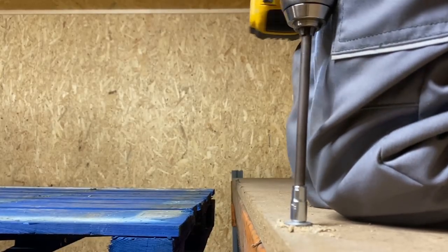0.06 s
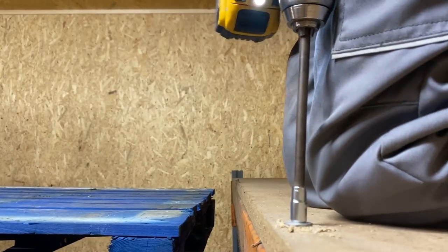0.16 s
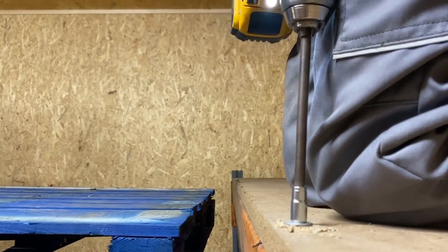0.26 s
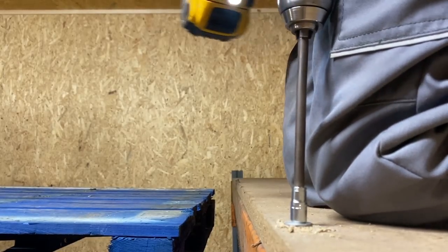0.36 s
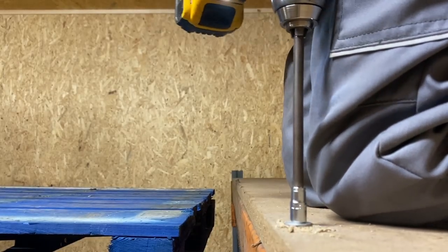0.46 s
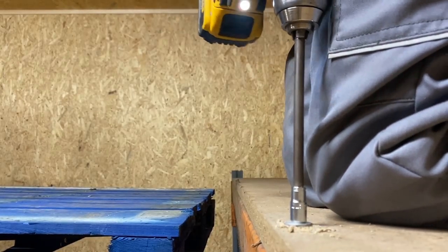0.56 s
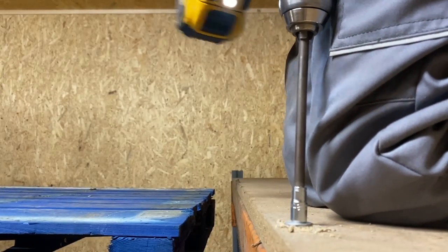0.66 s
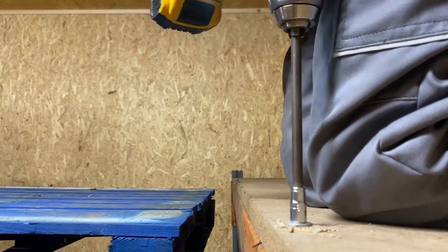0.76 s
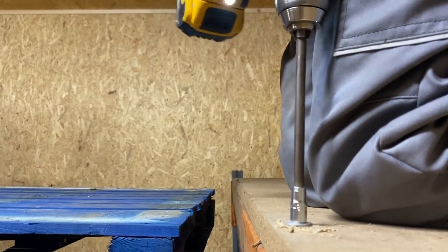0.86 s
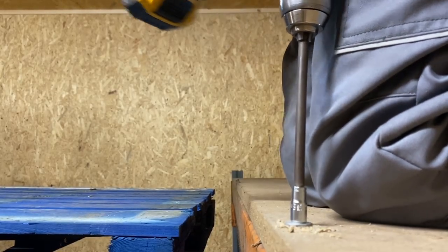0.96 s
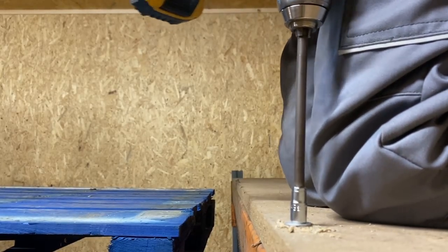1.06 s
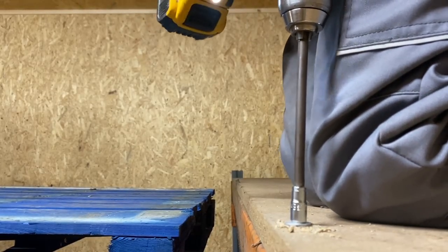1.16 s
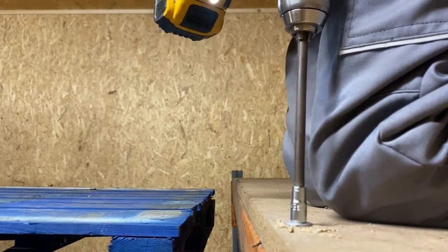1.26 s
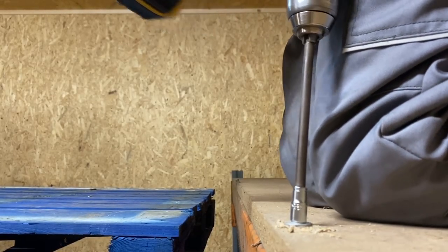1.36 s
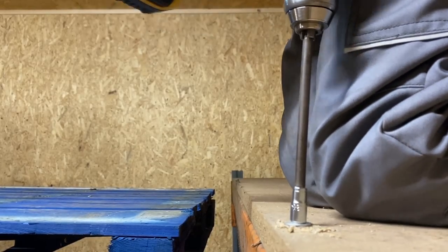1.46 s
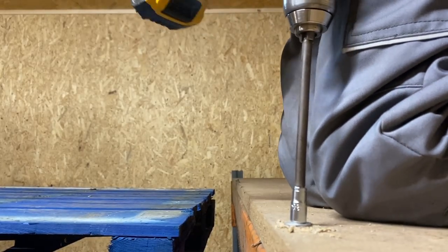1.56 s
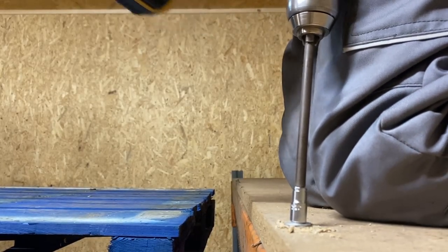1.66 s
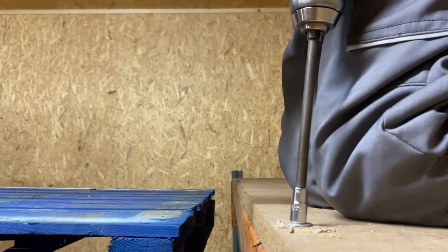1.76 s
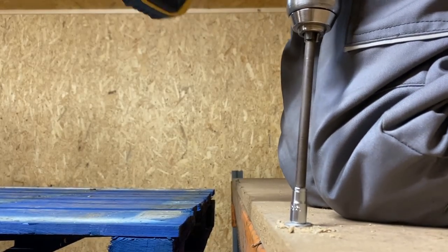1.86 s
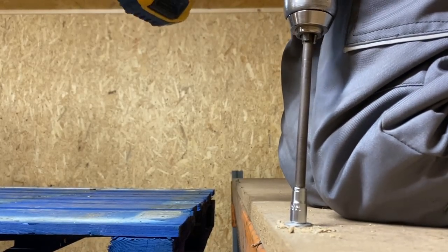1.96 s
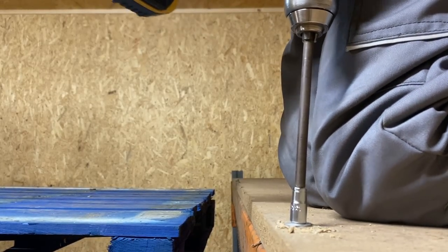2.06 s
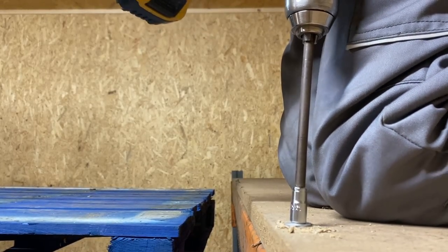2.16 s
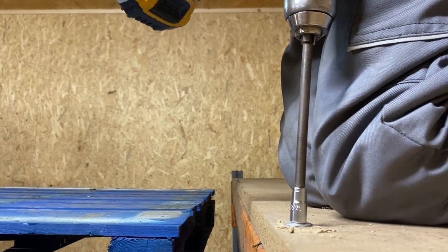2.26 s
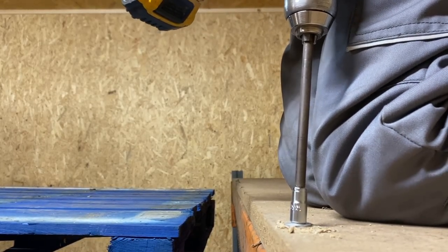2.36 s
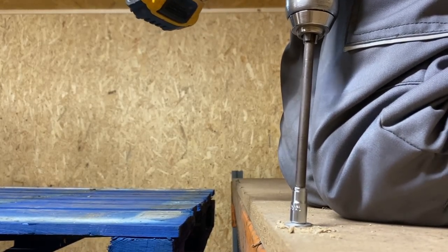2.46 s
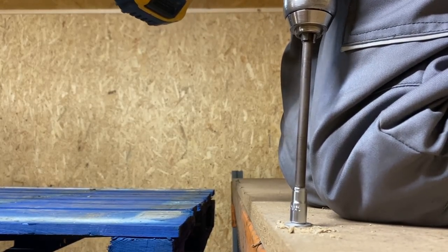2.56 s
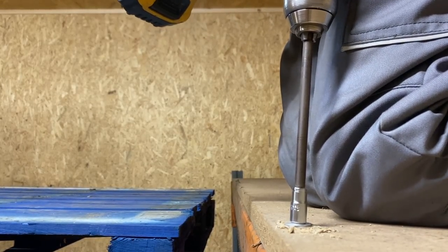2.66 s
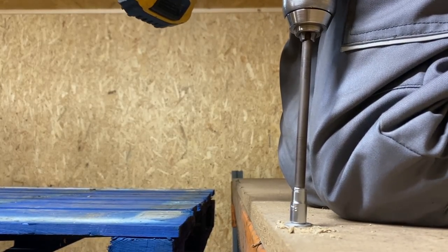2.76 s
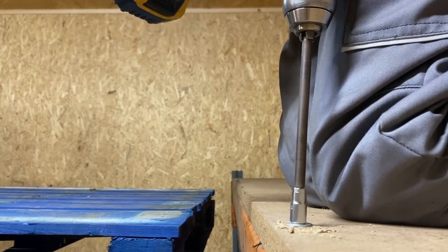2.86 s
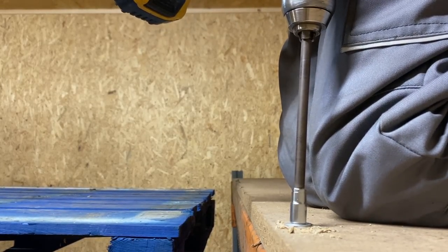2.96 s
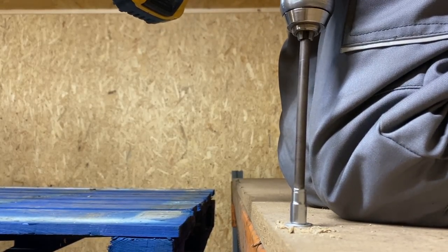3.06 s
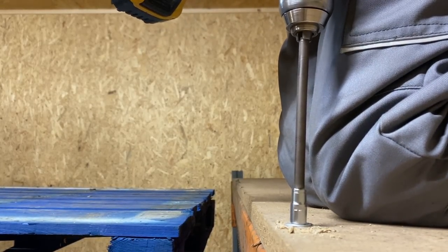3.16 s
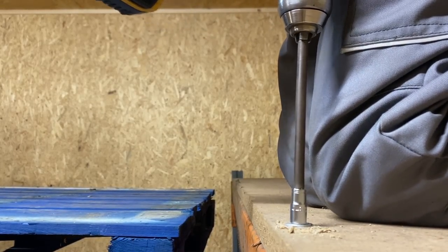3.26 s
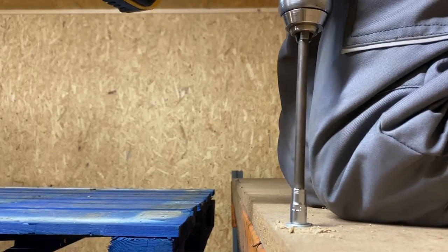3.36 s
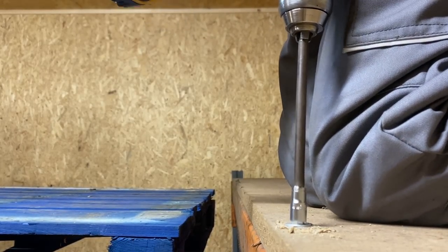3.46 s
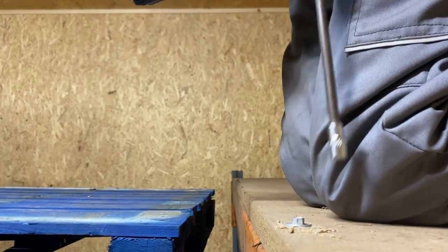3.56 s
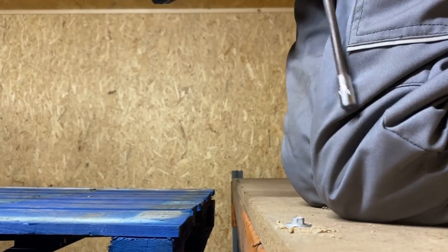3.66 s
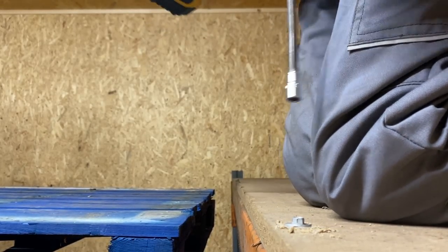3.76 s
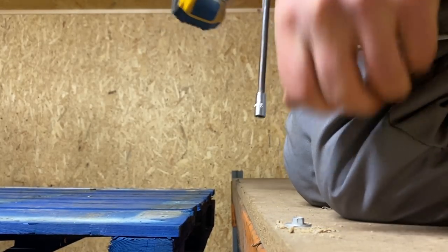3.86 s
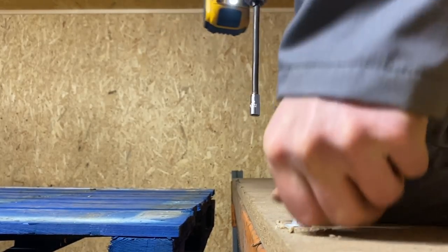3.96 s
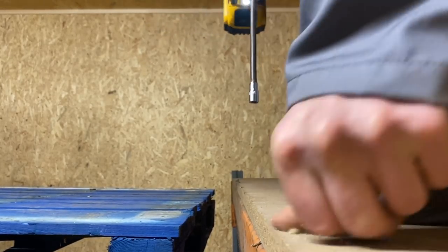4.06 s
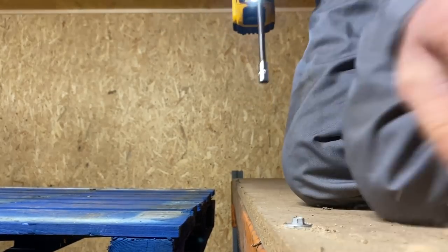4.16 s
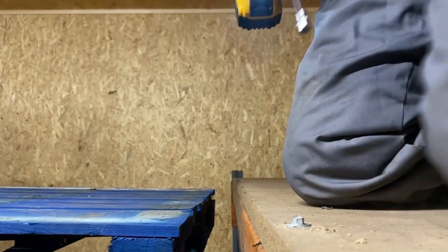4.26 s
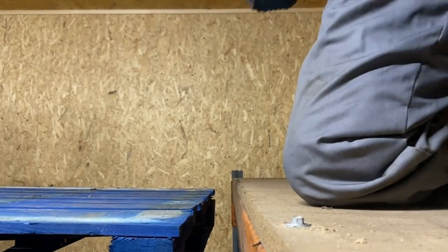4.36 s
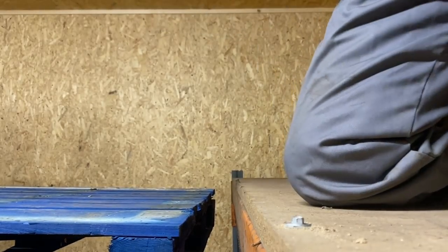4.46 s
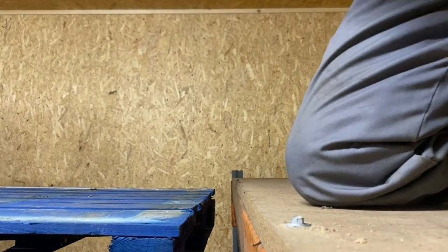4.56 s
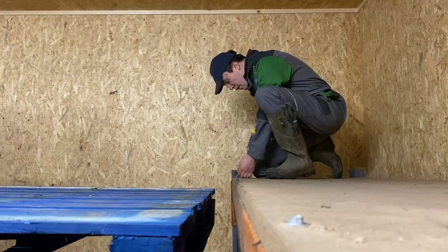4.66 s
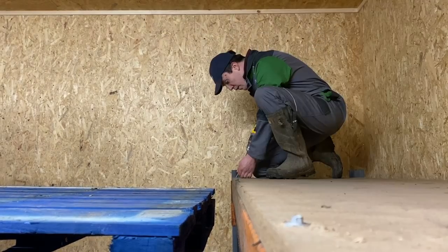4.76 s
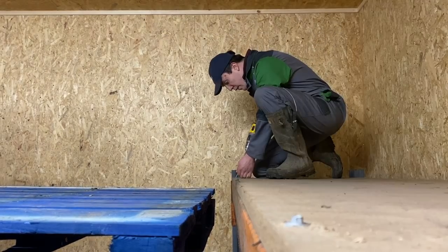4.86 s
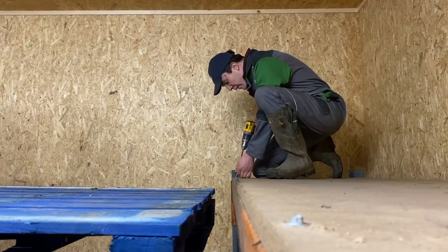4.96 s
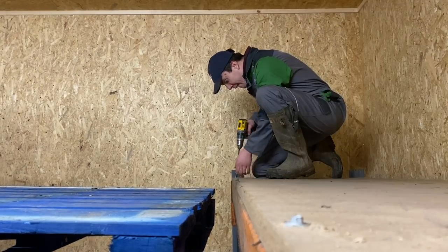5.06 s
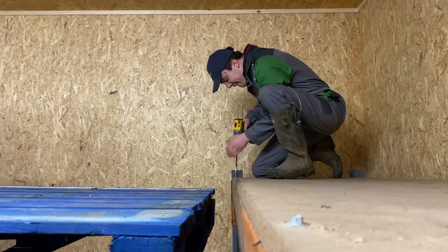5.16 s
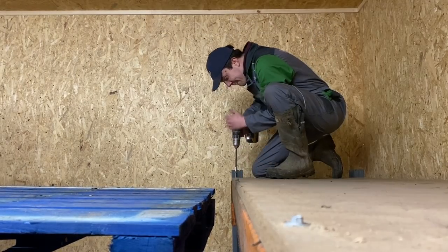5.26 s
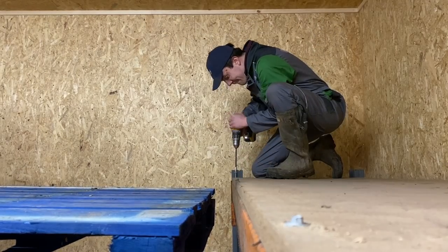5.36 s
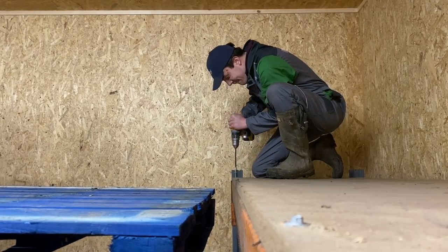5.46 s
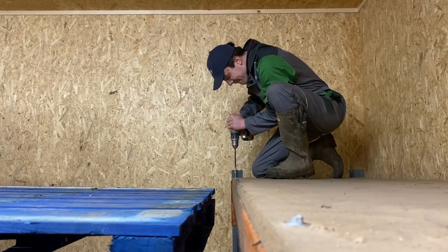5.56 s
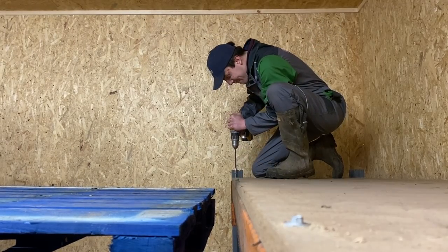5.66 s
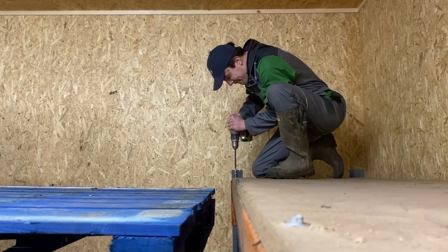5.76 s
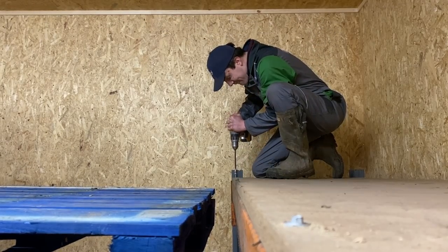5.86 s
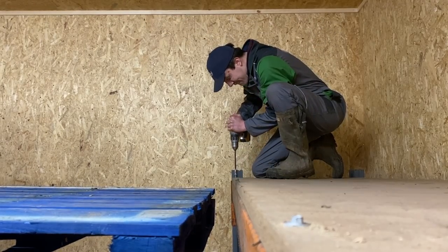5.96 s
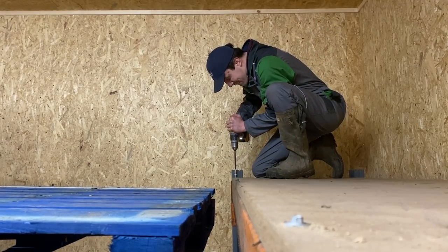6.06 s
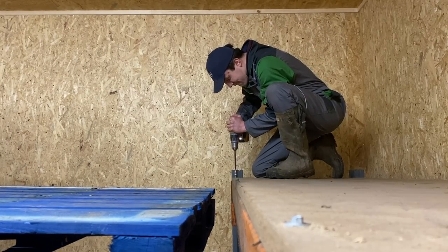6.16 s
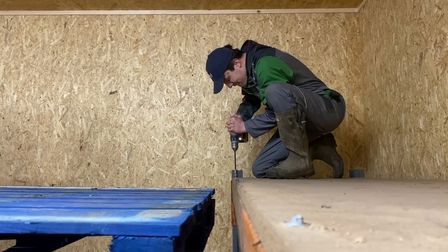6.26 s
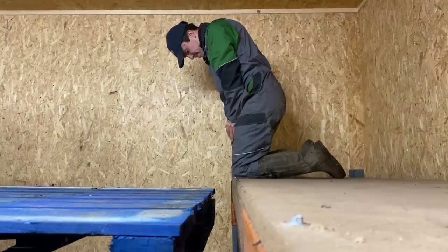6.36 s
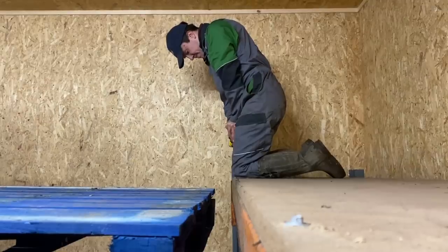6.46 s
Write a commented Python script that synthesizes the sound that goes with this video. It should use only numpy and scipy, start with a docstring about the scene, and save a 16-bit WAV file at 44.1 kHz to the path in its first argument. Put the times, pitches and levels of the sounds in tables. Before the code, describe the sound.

A small bare wooden room with faint low platform rumble, in stereo. A cordless drill very near gives six quick trigger pulls peaking around 0.1, 0.3, 0.7, 0.95, 1.35 and 1.7 seconds, each a rising and falling whine with whirr, gear rattle and a short braking grunt; dry ticks and light board thuds fall between. From 1.7 to 2.8 it creeps, single gear teeth clicking sharply, densest near 2.5. From 2.8 to 3.3 it labours in a lower, nasal, chattering drone, then ticks to rest. Socket clacks off at 3.5 with a board knock. Cloth rustles; a hand sweeps the board at 4.1; a knee thumps deeply at 4.63. Abrupt cut at 4.7: quieter, distant soft shuffling. At 5.35 the farther drill starts with a small clack, climbs to a high whine by 5.77, whirring and scraping steadily, then binds at 6.3 with a thump, the pitch sagging to the end.

```python
"""A bare wooden store room, heard through two microphone ports. A cordless drill close by gets six quick pulls,
creeps with ticking gears and labours a screw home; the socket clacks, a hand sweeps the board, a knee thumps.
After a cut the drill, further off, runs up and bores. Whines are unsteady sines on a moving pitch; gear teeth
are impulses ringing the gearbox; whirr, cloth and board are shaped noise; thumps are decaying sines."""
import sys
import numpy as np
from scipy import signal
from scipy.fft import rfft, irfft, next_fast_len
from scipy.io import wavfile
from scipy.ndimage import uniform_filter1d, map_coordinates

SR = 44100
rng = np.random.default_rng(int(sys.argv[2]) if len(sys.argv) > 2 else 0)


def wav_record(signal):
    """Record a signal, one row per channel, as 16-bit PCM in the file named by sys.argv[1]."""
    frames = np.transpose(np.atleast_2d(signal))
    bounded = np.clip(frames, -1, 1)
    # unit amplitude maps onto the largest positive 16-bit level
    quanta = np.round(bounded * 32767).astype(np.int16)
    wavfile.write(sys.argv[1], SR, quanta)


N = 287524
TIME = np.arange(N) / SR
CUT_S = 4.703  # near drill before, far drill after
LATE_S = 9  # past the end
TOP_HZ = 15800

# Platform resonances. Each row: centre in Hz, width in Hz, level in dB.
PLATFORM_MODES = [(52, 7, -1), (66, 10, 0), (100, 11, -7.5), (144.7, 20, -3.5), (191.4, 23, -8),
                  (390, 148, -7.5)]
# Rumble level. Each row: time in seconds, level in dB.
RUMBLE_LEVEL = [(0, -59), (.6, -54), (1.7, -54), (2.05, -50), (2.5, -55.5), (3.45, -52), (4.4, -56.5),
                (5.3, -60), (5.85, -54.5), (6.52, -54)]
# Platform booms under shifting weight. Each row: start in seconds, level before onset and decay in dB, pitch in Hz.
THUMPS = [(0.721, -39.5, 150), (.95, -41.5, 134.2), (1.36, -47, 150), (1.7, -37.5, 150),
          (3.07, -38.5, 195.4), (3.5, -37.5, 152.3), (3.53, -40, 49.5), (4.627, -30.5, 73.3),
          (4.64, -32.5, 51.3), (4.65, -36.5, 126.5), (4.71, -46, 62), (4.82, -46, 63), (5.0, -47, 60),
          (5.14, -47, 57), (5.28, -45, 57), (6.321, -35.5, 85), (6.36, -39, 60), (6.35, -42, 140)]
# Socket clacks, and a broad knock under the thump at 4.63 s. Each row: start in seconds, crack level before
# trim in dB, board level in dB, ring in Hz.
CLACKS = [(3.4646, -18.5, -11, 1300), (3.4999, -19.5, -16.5, 4650), (4.63, -43, 8, 600),
          (5.361, -43, -25, 3650), (5.454, -58.5, -19, 5230)]
# Cloth and hand, one list before and one after the cut. Each row: time in seconds, hiss before trim in dB, rub in dB.
RUSTLE = [
    [(3.53, -60.5, -43), (3.58, -65.5, -57.5), (3.684, -62, -59.5), (3.79, -73, -69), (4.056, -53.5, -48),
     (4.104, -38, -44.5), (4.156, -50.5, -49.5), (4.276, -56, -45), (4.544, -63.5, -60), (4.572, -57, -46),
     (4.598, -61.5, -55.5), (4.69, -68, -53)],
    [(4.71, -95, -72), (4.768, -98, -76.5), (4.942, -82.5, -78), (4.956, -75.5, -60), (4.966, -87, -79),
     (5.012, -92, -63), (5.024, -94, -81), (5.086, -88, -79), (5.212, -73.5, -66.5), (5.27, -84, -77),
     (5.314, -77, -76), (5.34, -90, -78.5)],
]
# Cloth hiss spectrum. Each row: frequency in Hz, level in dB.
HISS_COLOUR = [(1500, -12), (3000, -8), (4800, -6), (6500, -5.5), (9000, -13), (12000, -22.5),
               (16000, -29.5)]
# Hand rub spectrum. Each row: frequency in Hz, level in dB.
RUB_COLOUR = [(150, -10), (300, 0.5), (700, 0), (1500, -1.5), (2400, -5.5), (4000, -22.5), (8000, -43)]
CLACK_TRIM_DB, HISS_TRIM_DB = -11.5, 2.5
ROOM_HISS_DB, ROOM_RUB_DB = -80, -69  # cloth close by never quite rests
FAR_ROOM_DB = -10  # that resting cloth is fainter after the cut

# Far drill whine, rising in steps, then falling under load.
# Each row: time in seconds, pitch in Hz (capped at FULL_HZ).
BORE_PITCH = [(5.352, 299), (5.46, 650), (5.524, 849), (5.565, 1885), (5.61, 1980), (5.64, 2750),
              (5.679, 3060), (5.722, 3113), (5.748, 4270), (5.778, 6750), (6.37, 6750), (6.46, 6170),
              (6.53, 5130)]
# Far whine level by its pitch. Each row: pitch in Hz, level in dB.
FAR_CASE = [(300, -85), (650, -54), (2000, -52), (2700, -43), (3200, -43), (4300, -35), (5000, -53),
            (6100, -44.5), (6555, -51.5)]
# Hum partials. Each row: multiple of the hum, level in dB.
SHAFT_ORDERS = [(.5, -14), (1, 6.5), (2, -16.5), (3, -11)]
# Far whirr spectrum. Each row: frequency in Hz, level in dB.
FAR_WHIRR_COLOUR = [(150, -10.5), (400, -18.5), (900, 3.5), (1600, -3.5), (2400, -5.5), (4000, -3.5),
                    (6000, -7), (8000, -9.5), (9500, -23.5), (10500, -41), (16000, -45.5)]
# Bit scraping in the board. Each row: centre in Hz, width in Hz, level in dB.
SCRAPE_MODES = [(2900, 260, 0), (3130, 220, 0), (3350, 180, -2), (1890, 150, -9), (1510, 120, -9)]
# Board resonances. Each row: centre in Hz, width in Hz, level in dB.
BOARD_MODES = [(192, 110, -12), (418, 110, 2.5), (880, 100, -4), (1272, 310, -2), (1520, 130, -2.5)]
FULL_HZ, HUM_HZ = 6555, 409.2  # whine at full speed; steady hum
TOUCH_S, FULL_S, BITE_S = 5.533, 5.765, 6.32  # bit meets board; full speed; bit binds
WHIRR_DB, WHIRR_DB_PER_DECADE, IDLE_DB = -31.5, 24, -4  # at full speed; gain per tenfold speed; before touch
BOARD_DB, BOARD_DB_PER_DECADE, BOARD_BITE_DB = -45, 25, 8
HUM_DB, SCRAPE_DB, WHINE_BITE_DB = -44, -32, 9
PINION_DB, PINION_DB_PER_S = -47, 8  # at full speed; growth
FAR_TEETH = .6  # share of gear rattle on the run-up

# Gearbox resonances. Each row: centre in Hz, width in Hz, level in dB.
GEAR_MODES = [(4010, 300, 0), (5200, 1000, -14), (2800, 900, -17), (9200, 2500, -19.5)]
# Housing resonances. Each row: centre in Hz, width in Hz, level in dB.
HOUSING_MODES = [(715.5, 95, 0), (835, 74, -0.5), (947, 101, -4.5), (1800, 1020, -20)]
# Near whirr spectrum. Each row: frequency in Hz, level in dB.
WHIRR_COLOUR = [(150, -20), (400, -4), (800, -0.5), (1700, 1), (2700, -5.5), (4000, -6), (5500, -8),
                (8000, -6), (9200, -30), (10500, -51.5), (16000, -36)]
# Labouring against the screw. Each row: time in seconds, whine in Hz, level before partial gain in dB.
LABOUR_WHINE = [(2.77, 590, -63), (2.79, 597, -41.5), (2.83, 641, -42.5), (2.862, 933, -42),
                (2.91, 750, -24), (3.026, 758, -27.5), (3.055, 750, -43), (3.16, 814, -25.5),
                (3.18, 793, -41), (3.208, 780, -24.5), (3.26, 714.2, -24.5), (3.299, 692, -41.5),
                (3.345, 692, -71.5)]
CHATTER_START_S, CHATTER_STOP_S, CHATTER_DB = 2.785, 3.27, -34
# Slow turning, mostly coasting. Each row: start in seconds, stop in seconds, whirr in dB, housing drone in dB,
# fade in dB per second, teeth per second at the start, tooth level before teeth gain in dB.
SPELLS = [(0, .04, -60, -56, 0, 40, -60), (0.171, .28, -46.5, -45, 14, 70, -50),
          (0.258, 0.286, -44.5, -50, 0, 60, -45), (0.389, .612, -49, -45, 19.5, 60, -55),
          (0.711, .89, -48.5, -42.5, 38, 70, -41), (.99, 1.26, -48, -39, 51.5, 92, -32),
          (1.411, 1.6, -44, -40, 45, 85, -32), (1.604, 1.634, -37, -40, 0, 60, -40),
          (1.73, 1.945, -41, -40, 60, 120, -29), (1.972, 2.03, -43, -43, 0, 110, -30),
          (2.03, 2.2, -50, -43, 45, 65, -36), (2.2, 2.35, -60, -58, 60, 20, -48),
          (2.426, 2.444, -57, -66, 0, 65, -48), (2.469, 2.605, -53.5, -49.5, 5, 75, -41),
          (2.633, 2.78, -50.5, -49, 1, 67, -39), (2.775, 3.265, -41, -36, -2.5, 30, -50),
          (3.27, 3.46, -52, -38, 30, 60, -42)]
# Loudest single teeth. Each row: time in seconds, level before teeth gain in dB.
TICKS = [(0.2578, -33), (0.6354, -27), (0.7642, -35), (0.8205, -42), (0.9014, -28.5), (1.054, -29),
         (1.0778, -38), (1.092, -35), (1.1398, -35), (1.1737, -42), (1.193, -38), (1.282, -35.5),
         (1.3079, -24), (1.5024, -36), (1.5409, -36), (1.5868, -30), (1.6132, -29), (1.7454, -32),
         (1.7958, -29), (1.851, -30), (1.8867, -34), (1.9804, -26), (2.0014, -25), (2.0124, -28),
         (2.0443, -35), (2.0767, -36), (2.0916, -30), (2.1046, -27.5), (2.14, -40), (2.3351, -47),
         (2.4394, -28.5), (2.4748, -30), (2.4853, -27), (2.4982, -23), (2.5114, -28.5), (2.5237, -28),
         (2.5386, -22), (2.5544, -35), (2.5745, -29), (2.5945, -23.5), (2.6419, -34), (2.6559, -27),
         (2.6693, -21.5), (2.6978, -29), (2.7127, -22), (2.7284, -40), (2.7432, -28), (2.7591, -23),
         (2.7791, -25), (3.2824, -28), (3.3084, -33), (3.3378, -32), (3.4047, -40)]
START_S, STOP_S = 0.0041, 0.024  # spell rise; decay constant
SLOWING_PER_S, TOOTH_SPREAD_DB = 3, 3
TOOTH_HOUSING_DB, TICK_HOUSING_DB, TEETH_GAIN_DB = -5.5, -15, 30
PULL_DRONE_DB, BRAKE_DB, BRAKE_T60_S = -42, -13, .07  # brake grunt is relative to the pull's whine column

# Trigger pulls. Each row: time of top speed in seconds, run-up in seconds, braking in seconds, top whine in Hz,
# sharpness of the turn, whine before trim in dB, whirr before trim in dB.
PULLS = [(0.109, 0.08, 0.068, 3800, 4.43, -34, -27), (.331, 0.055, 0.059, 2900, 4.4, -27, -29.5),
         (.669, 0.041, 0.039, 1802, 4, -31, -29), (.947, 0.051, 0.042, 2200, 6.06, -27.5, -26.5),
         (1.355, .06, 0.062, 2705, 6, -26, -25), (1.684, 0.061, 0.055, 2350, 2.52, -25, -25.5)]
# Whine overtones. Each row: multiple of the whine, level in dB.
OVERTONES = [(23 / 16, -19.5), (2, -10.5), (3, -16), (4.1, -19)]
# How the case radiates the whine. Each row: frequency in Hz, level in dB.
CASE_COLOUR = [(500, -12), (800, 0.5), (1100, -6), (1650, 0.5), (2300, -8.5), (3000, -3.5), (3800, -0.5),
               (5400, 0.5), (6500, 5.5), (9000, -10), (11000, -31.5)]
# Air slots of the motor fan. Each row: centre in Hz, width in Hz, level in dB.
FAN_MODES = [(5290, 610, -1.5), (8690, 2600, -14.5)]
PULL_WHINE_TRIM_DB, PULL_WHIRR_TRIM_DB = 4.5, -3.0
FAN_DB = -29  # at 3000 Hz whine

# Ports, near drill. Each row: frequency in Hz, left lead in radians, left-right in dB, likeness 0-1.
PORTS_NEAR = [(130, 0, -1.3, .8), (400, -1.2, -2, .5), (700, 1.4, 4, .75), (950, 2.1, 2, .55),
              (1400, .3, -4.5, .75), (2000, .2, -1.5, .92), (3400, .4, -8, .75), (4300, -.8, -8, .7),
              (5100, 0, 1, .88), (6000, 1.6, 0, .85)]
# Ports, far drill. Each row: frequency in Hz, left lead in radians, left-right in dB, likeness 0-1.
PORTS_FAR = [(130, 0, -1, .94), (400, -2.6, -6, .93), (700, -1, -3, .35), (1000, 2.8, -4.5, .35),
             (1500, .2, -4, .55), (2100, .4, -1.5, .8), (2800, 1.4, -2.5, .5), (4000, .7, -2, .75),
             (5100, 0, 1, .75), (6000, 1.6, 0, .8)]
# Ports, treble for both. Each row: frequency in Hz, left lead in radians, left-right in dB, likeness 0-1.
PORTS_TOP = [(6950, np.pi, 0, 1), (7900, np.pi, 0, 1), (8900, 1.5 * np.pi, 0, .75), (9800, 2 * np.pi, 0, 1),
             (11300, 2 * np.pi, 0, 1), (12000, 2.5 * np.pi, 0, .5), (12600, 3 * np.pi, 0, 1),
             (14500, 3 * np.pi, 0, 1), (15400, 4 * np.pi, 0, .8)]


def amp(db):
    """Decibels to gain."""
    return np.exp(np.asarray(db) * (np.log(10) / 20))


def unit(x):
    """Scaled to rms 1."""
    return x / np.sqrt(np.mean(x ** 2) + 1e-20)


def curves(rows):
    """One value per sample for each column after the time."""
    s, *cols = np.transpose(rows)
    return [np.interp(TIME, s, c) for c in cols]


def along(points, hz):
    """Each column after the frequency, read on a log axis."""
    f, *cols = np.transpose(points)
    at = np.log(hz + 1)
    return [np.interp(at, np.log(f + 1), c) for c in cols]


def wobble(rate):
    """A smooth random curve, rate knots a second."""
    coarse = TIME[::8]
    knots = rng.standard_normal(int(N * rate / SR) + 4)
    return np.interp(TIME, coarse, map_coordinates(knots, [coarse * rate]))


def filtered(x, response):
    """x times a complex response of frequency."""
    m = next_fast_len(N + SR // 4)
    return irfft(rfft(x, m) * response(np.fft.rfftfreq(m, 1 / SR)), m)[..., :N]


def rung(x, modes):
    """x through causal resonances of alternating sign."""
    def response(f):
        return sum((-1) ** k * amp(db) * 1j * f * w / (c * c - f * f + 1j * f * w)
                   for k, (c, w, db) in enumerate(modes))
    return filtered(x, response)


def noise(colour, grain_db, rate):
    """Coloured noise of rms 1 whose level flutters."""
    grain = rng.standard_normal(N) * amp(grain_db * wobble(rate))
    return unit(filtered(grain, lambda hz: amp(along(colour, hz)[0])))


def rung_noise(modes, grain_db, rate):
    """Fluttering noise through resonances, rms 1."""
    return unit(rung(rng.standard_normal(N) * amp(grain_db * wobble(rate)), modes))


def tones(hz, orders, flutter_db, rate, waver):
    """Multiples of a moving pitch, each unsteady in level and phase (waver in radians)."""
    turn = 2 * np.pi * np.cumsum(hz) / SR
    out = np.zeros(N)
    for k, db in orders:
        level = amp(db + flutter_db * wobble(rate)) * np.sqrt(2)
        out += level * np.sin(k * turn + waver * wobble(rate))
    return out


def blows(seconds, db):
    """One impulse per event."""
    return np.bincount(np.round(np.asarray(seconds) * SR).astype(int), amp(db), N)[:N]


def strikes(rate):
    """Impulses at a moving rate per second."""
    return np.diff(np.floor(np.cumsum(rate) / SR), prepend=0)


def scatter(rate, uneven, spread_db):
    """Impulses of random size at an uneven rate."""
    hits = strikes(rate * np.abs(1 + uneven * wobble(rate)))
    return hits * amp(spread_db * rng.standard_normal(N))


def teeth(hits):
    """Tooth contacts last a fraction of a millisecond and ring the gearbox."""
    return filtered(rung(hits, GEAR_MODES), lambda hz: 1 / (1 + 1j * hz / 8000) ** 3)


def gate(start, stop, rise, fall):
    """0 to 1 and back: attack, hold, exponential release."""
    return np.clip((TIME - start) / rise, 0, 1) * np.exp(-np.clip(TIME - stop, 0, 1) / fall)


def platform_rumble():
    """Noise through the platform resonances, rolled off at both ends, level drifting."""
    rumble = rung(rng.standard_normal(N), PLATFORM_MODES)
    rumble = unit(filtered(rumble, lambda hz: np.minimum(hz / 36, 1) ** 2.2 / (1 + (hz / 400) ** 2)))
    return amp(curves(RUMBLE_LEVEL)[0] + 1.8 * wobble(5)) * rumble


def cloth():
    """Cloth hiss and a hand's rub: coloured noises on level curves over a resting floor."""
    rows = [(3.38, -84.5, -71)] + sum(map(list, RUSTLE), []) + [(5.7, -71.5, -65)]
    hiss_db, rub_db = curves(rows)
    far_db = FAR_ROOM_DB * (TIME > CUT_S)
    hiss = amp(hiss_db + HISS_TRIM_DB) + amp(ROOM_HISS_DB + far_db)
    rub = amp(rub_db) + amp(ROOM_RUB_DB + far_db)
    return hiss * noise(HISS_COLOUR, grain_db=1.5, rate=99) + rub * noise(RUB_COLOUR, grain_db=2.0, rate=46)


def thumps():
    """Platform booms: low sines, 3 ms onset constant, T60 0.36 s."""
    out = np.zeros(N)
    t = TIME[:SR // 7]
    for s, db, hz in THUMPS:
        boom = amp(db - 60 * t / 0.36) * (1 - np.exp(-t / 0.003)) * np.sin(2 * np.pi * hz * t)
        same_side = (s > CUT_S) | (s + t < CUT_S)  # no tail across the cut
        out[round(s * SR):][:len(t)] += boom * same_side
    return out


def clacks():
    """Socket clacks, and a broad knock under the thump at 4.63 s: a short noise crack with a ring, plus a 230
    Hz board knock."""
    out = np.zeros(N)
    t = TIME[:SR // 7]
    for s, db, board_db, hz in CLACKS:
        crack = np.convolve(rng.standard_normal(len(t)), np.hanning(7), "same")
        crack += 1.35 * np.sin(2 * np.pi * hz * t)
        board = amp(board_db - 60 * t / 0.035) * np.sin(2 * np.pi * 230 * t)
        out[round(s * SR):][:len(t)] += amp(db + CLACK_TRIM_DB - 60 * t / 0.016) * crack + amp(db) * board
    return out


def boring():
    """Whine, pinion mesh at 23/16 of it, a low hum that holds its pitch, fan whirr, cutting bit and board."""
    hz = np.minimum(curves(BORE_PITCH)[0], FULL_HZ)
    running = gate(BORE_PITCH[0][0], LATE_S, 0.0059, 1)
    full = gate(FULL_S - .02, LATE_S, .03, 1)
    speed_decades = np.log10(np.maximum.accumulate(hz) / FULL_HZ)  # highest speed so far

    whine = tones(hz, [(1, -3), (.5, -14)], flutter_db=4.5, rate=160, waver=1.1)
    whine *= amp(along(FAR_CASE, hz)[0] + WHINE_BITE_DB * (TIME > BITE_S))
    pinion = tones(hz, [(23 / 16, 0)], flutter_db=3, rate=110, waver=1.1)
    pinion *= amp(PINION_DB + PINION_DB_PER_S * (TIME - FULL_S))
    hum = amp(HUM_DB) * tones(np.full(N, HUM_HZ), SHAFT_ORDERS, flutter_db=2.5, rate=14, waver=.3)

    scrape = rung_noise(SCRAPE_MODES, grain_db=1.5, rate=200)
    scrape *= amp(SCRAPE_DB) * gate(0, BITE_S, 1, 0.005)
    board = rung_noise(BOARD_MODES, grain_db=2.5, rate=30)
    bite_db = BOARD_BITE_DB * gate(BITE_S - .01, LATE_S, .02, 1)
    board *= amp(BOARD_DB + BOARD_DB_PER_DECADE * speed_decades + bite_db)

    rattle = FAR_TEETH * (1 - full) * unit(teeth(scatter(250, .5, 5)))
    whirr = noise(FAR_WHIRR_COLOUR, grain_db=1.5, rate=150) + rattle
    whirr *= amp(WHIRR_DB + WHIRR_DB_PER_DECADE * speed_decades + IDLE_DB * (TIME < TOUCH_S))
    return running * (whine + whirr + board) + full * (pinion + hum + scrape)


def labour():
    """Under load the whine sits in the housing resonance and the teeth chatter about 300 times a second."""
    hz, whine_db = curves([(2.74, 590, -100)] + LABOUR_WHINE + [(3.4, 673, -100)])
    whine = amp(whine_db) * tones(hz, [(1, 3.0), (2, -25.0)], flutter_db=2.2, rate=73, waver=0.25)
    chatter = unit(teeth(scatter(300, .35, 4.0) + 0.1 * rng.standard_normal(N)))
    chatter *= amp(CHATTER_DB) * gate(CHATTER_START_S - .012, CHATTER_STOP_S, .012, .005)
    return whine + chatter


def creep():
    """Slow turning: faint whirr, a droning housing and single gear teeth."""
    whirr, hum, rate, size = np.zeros((4, N))
    for start, stop, whirr_db, drone_db, fade_db, per_s, tooth_db in SPELLS:
        since = np.maximum(TIME - start, 0)
        level = gate(start, stop, START_S, STOP_S) * amp(-fade_db * since)
        whirr += amp(whirr_db) * level
        hum += amp(drone_db) * level
        on = (TIME > start) & (TIME < stop)
        coasting = fade_db > 5  # teeth come ever slower
        rate += on * per_s * np.exp(-SLOWING_PER_S * since * coasting)
        size += on * amp(tooth_db) * np.sqrt(level)
    # The housing drones in a pull and grunts as the brake stops it.
    for s, rise, fall, _, _, whine_db, _ in PULLS:
        hum += amp(PULL_DRONE_DB) * gate(s - rise, s + fall, 0.012, 0.012)
        grunt = gate(s + .65 * fall, s + .9 * fall, .01, BRAKE_T60_S / np.log(1000))
        hum += amp(whine_db + BRAKE_DB) * grunt
    drone = rung_noise(HOUSING_MODES, grain_db=2.1, rate=70)

    train = strikes(rate * (1 + .15 * wobble(60)))
    train *= size * amp(TOOTH_SPREAD_DB * rng.standard_normal(N))
    loud = blows(*np.transpose(TICKS))
    housing = rung(amp(TOOTH_HOUSING_DB) * train + amp(TICK_HOUSING_DB) * loud, HOUSING_MODES)
    clear = teeth(train + loud) + housing
    murmur = noise(WHIRR_COLOUR, grain_db=3, rate=200) + .3 * unit(teeth(scatter(110, .25, 3)))
    return whirr * murmur + hum * amp(1.5 * wobble(14)) * drone + amp(TEETH_GAIN_DB) * clear


def trigger_pulls():
    """The motor speeds up, then brakes; whine, gear rattle and fan hiss grow with speed."""
    hz, whine, whirr = np.zeros((3, N))
    for s, rise, fall, top_hz, sharp, whine_db, whirr_db in PULLS:
        up = np.clip(1 + (TIME - s) / rise, 1e-4, 9)
        down = np.clip(1 - (TIME - s) / fall, 1e-4, 9)
        speed = ((up ** -sharp + down ** -sharp) / 2) ** (-1 / sharp)  # rounded turn from run-up to braking
        hz += top_hz * speed
        whine += amp(whine_db + PULL_WHINE_TRIM_DB) * np.minimum(speed * 1.3, 1) ** 1.42
        whirr += amp(whirr_db + PULL_WHIRR_TRIM_DB) * np.minimum(speed * 1.32, 1) ** 0.97
    note = tones(hz, [(1, 0)], flutter_db=3.2, rate=110, waver=.25)
    note += tones(hz, OVERTONES, flutter_db=3.8, rate=400, waver=1.4)
    rattle = noise(WHIRR_COLOUR, grain_db=1.5, rate=400) + 0.43 * unit(teeth(scatter(700, .5, 4)))
    fan = amp(FAN_DB) * (hz / 3000) ** 1.38 * rung_noise(FAN_MODES, grain_db=3, rate=300)
    fan = filtered(fan, lambda f: 1 / (1 + (f / 9500) ** 8))
    radiated = filtered(whine * note, lambda f: amp(along(CASE_COLOUR, f)[0]))
    return radiated + whirr * rattle + fan


def ports(x, table, t60, wet_db):
    """The room rings briefly; what differs between the ports arrives through a second, unrelated tail."""
    t = TIME[:SR // 4]
    tails = rng.standard_normal((2, len(t))) * amp(-60 * t / t60)
    tails -= uniform_filter1d(tails, size=200, axis=1)  # little bass in the tails keeps the low end steady
    wet = signal.fftconvolve(x[None], tails / np.linalg.norm(tails[0]), axes=1)[:, :N]
    shared = x + amp(wet_db) * wet[0]
    unlike = (wet[1] + .3 * x) * wobble(25)  # a random wobble keeps left and right unlike
    m = next_fast_len(N + SR // 4)
    lead, balance_db, alike = along(table + PORTS_TOP, np.fft.rfftfreq(m, 1 / SR))
    turn = np.arccos(np.clip(alike, 0, 1)) / 2
    same, other = rfft(np.array([shared, unlike]), m) * [np.cos(turn), np.sin(turn)]
    left = amp(balance_db / 2) * np.exp(.5j * lead)
    return irfft([(same + other) * left, (same - other) / left], m)[:, :N]


def scene():
    """The near drill until the cut, the far drill after it, over handling and platform rumble."""
    about = platform_rumble() + cloth() + thumps() + clacks()
    far = ports((boring() + about) * (TIME >= CUT_S), PORTS_FAR, t60=0.14, wet_db=-8.5)
    near = ports(labour() + creep() + trigger_pulls() + about, PORTS_NEAR, t60=0.1, wet_db=-12.0)
    return np.where(TIME < CUT_S, near, far)


def record(dry):
    """Nothing is kept above the band limit."""
    return filtered(dry, lambda hz: hz < TOP_HZ)


dry = scene()
out = record(dry)
wav_record(out)
```